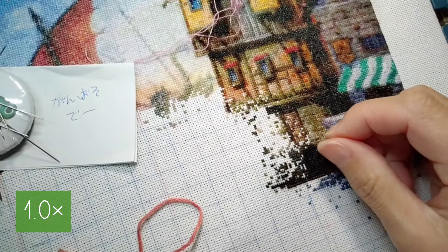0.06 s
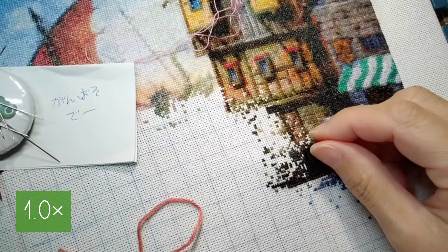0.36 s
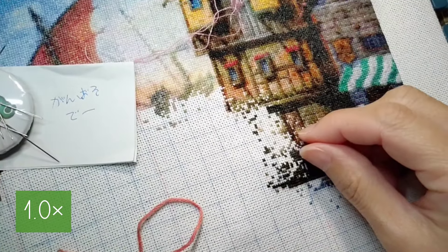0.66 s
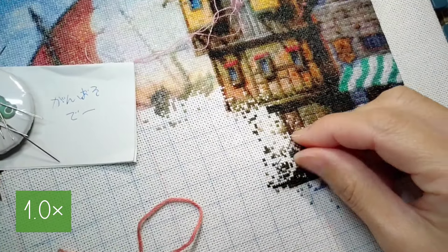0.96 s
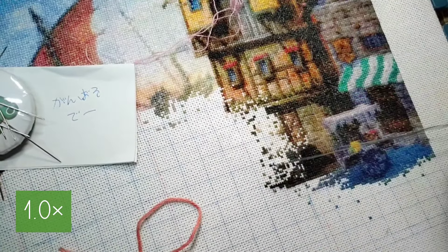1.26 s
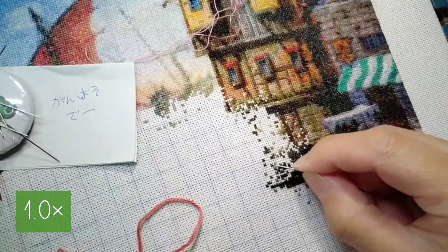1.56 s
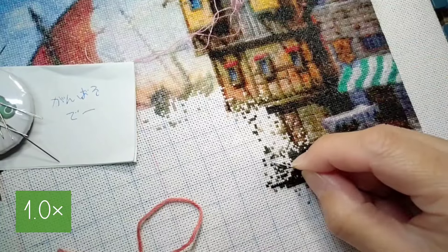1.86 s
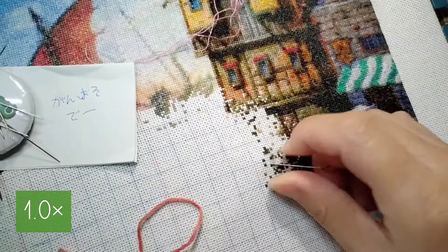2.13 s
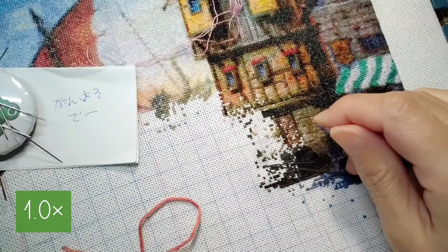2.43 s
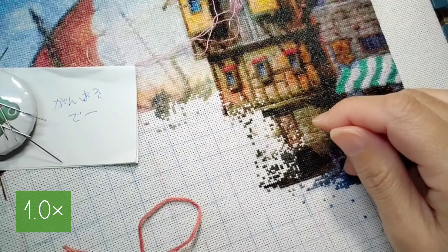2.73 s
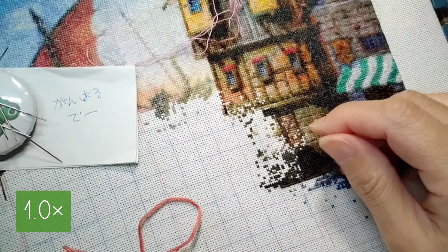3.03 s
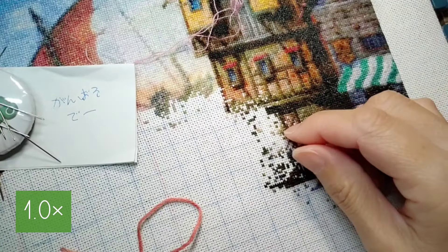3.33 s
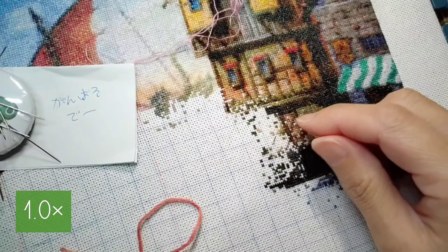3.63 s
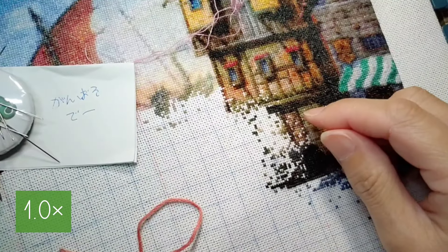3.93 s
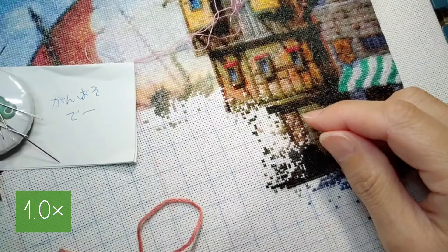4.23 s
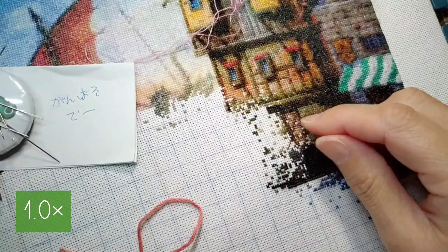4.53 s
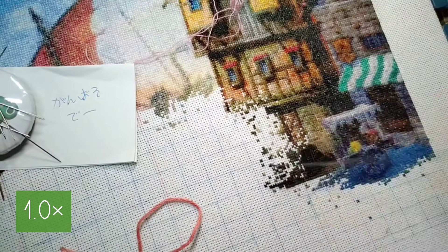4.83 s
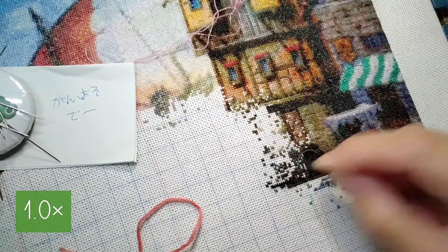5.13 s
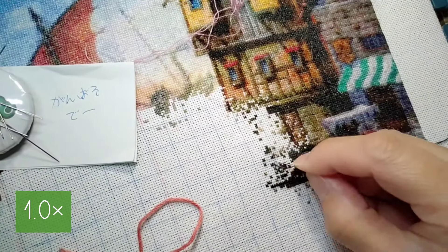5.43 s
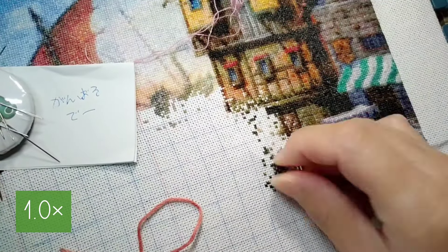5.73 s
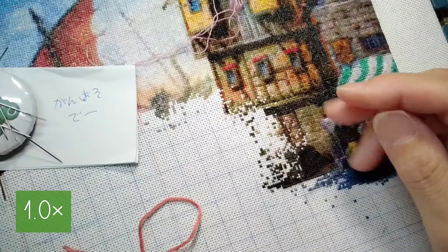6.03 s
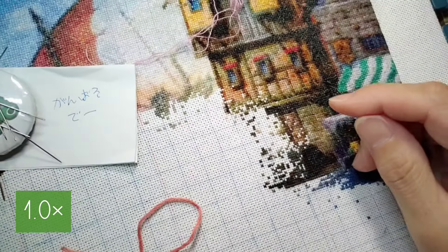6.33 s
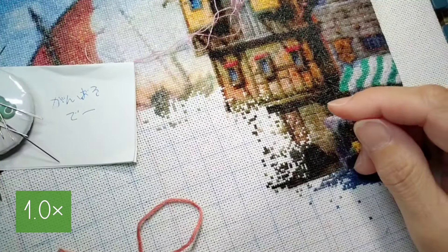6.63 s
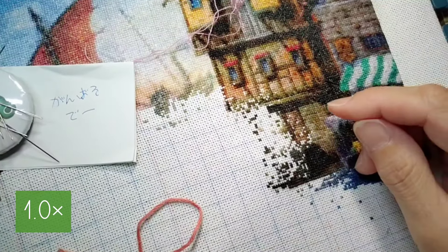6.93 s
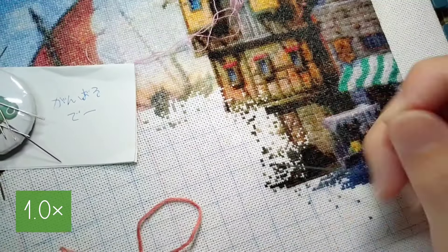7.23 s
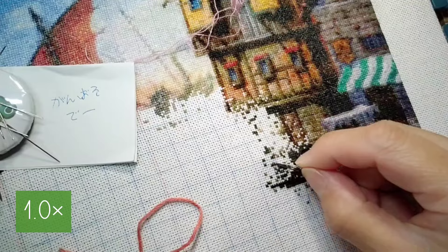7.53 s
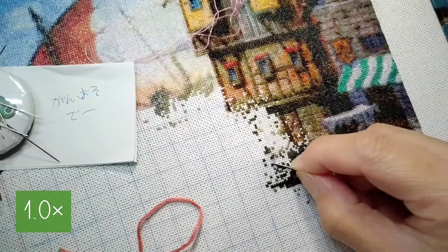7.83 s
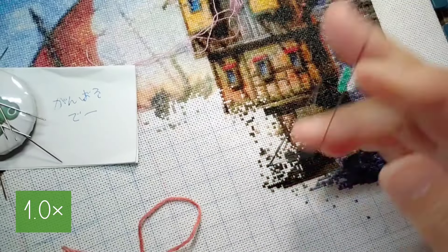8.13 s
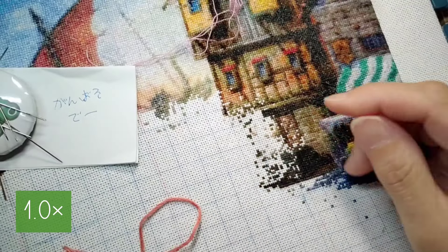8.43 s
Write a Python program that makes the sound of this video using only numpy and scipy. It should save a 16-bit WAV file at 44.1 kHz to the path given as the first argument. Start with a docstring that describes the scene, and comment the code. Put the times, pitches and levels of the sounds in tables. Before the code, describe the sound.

A needle taps through taut cloth and thread is drawn through in short, scratchy pulls, close by in a quiet room.

```python
"""Cross-stitch on cloth stretched in a frame, close by in a quiet room where an appliance hums faintly.
First the needle pops through the taut weave, which rings like a soft drum skin. At about 1 s the thread
is yanked up, juddering by stick-slip friction, and runs out with a hiss of fibres catching in the hole.
At 2 s the needle pierces again and the thread is hauled down in heaves, snagging on the way.
Two more stitches follow, up near 5 s and down near 6 s, then up near 7 s and down near 8 s."""
import sys
import numpy as np
from scipy import signal
from scipy.fft import rfft, irfft, next_fast_len
from scipy.io import wavfile

SR = 44100
rng = np.random.default_rng(int(sys.argv[2]) if len(sys.argv) > 2 else 0)


def transcribe(u):
    """Save the signal u as a 16-bit wav file named by the first command-line argument.

    u: samples, shape (n,) or (channels, n), limited to [-1, 1]; the rate is SR.
    q: integer samples, one column per channel.
    """
    v = np.clip(np.atleast_2d(u).T, -1, 1)
    q = np.round(v * 32767).astype(np.int16)
    wavfile.write(sys.argv[1], SR, q)


N = 373527
TIME = np.arange(N) / SR

# needle, thread and fingers flicking the cloth:
# (time [s], relative thump level [dB], nominal pitch [Hz], relative tick level [dB])
FLICKS = [(0.197, -49, 425, -58.5), (0.3148, -40.5, 750, -42), (0.41, -40.5, 177, -64),
          (2.043, -44.5, 540, -36), (2.266, -49.5, 276, -55), (2.399, -48, 700, -53),
          (3.053, -57, 440, -55), (3.364, -48, 513, -65), (3.395, -33.5, 726, -49.5),
          (3.409, -41, 523, -68), (3.999, -44.5, 483, -63), (4.117, -50, 195, -68),
          (4.186, -44.5, 307, -69), (4.272, -34, 405, -56.5), (4.483, -48, 205, -67), (5.28, -42, 75, -65),
          (5.996, -42, 790, -48.5), (6.194, -39, 218, -66), (6.223, -42, 420, -58.5),
          (6.429, -41.5, 453, -52), (6.453, -45, 483, -48.5), (6.461, -41.5, 516, -58),
          (6.491, -34, 555, -49), (6.544, -37, 240, -61), (6.562, -34, 496, -46.5), (6.769, -44, 590, -69),
          (6.791, -44, 520, -64), (6.946, -38.5, 293.4, -66.5), (8.218, -43, 170, -67)]
# the thread snagging in the hole:
# (time [s], jolt level [dB], jolt pitch [Hz], relative tick level [dB], crack level [dB])
THREAD_SNAGS = [(1.292, -40, 376, -39, -57), (2.391, -58.5, 298, -51, -66), (2.606, -44, 240, -59, -56),
                (2.65, -36, 298, -50, -50), (4.854, -40.5, 376, -43, -58), (5.911, -42.5, 458, -43, -52),
                (7.3, -40.5, 394, -37, -50), (8.133, -49, 420, -68, -48.5)]
# thread drawn up: (time [s], yank length [s], run length [s], relative level [dB])
UPWARD_PULLS = [(1.157, 0.13, 0.26, -48.5), (4.699, 0.14, 0.33, -49), (7.15, 0.142, 0.25, -47)]


def gain_of(db):
    """Amplitude ratio of a level in decibels."""
    return 10 ** (np.asarray(db) / 20)


def unit_rms(x):
    """Normalisation to rms 1."""
    return x / np.sqrt(np.mean(x ** 2) + 1e-20)


def curve_at(points, hz):
    """Interpolation on a log-frequency axis."""
    freqs, values = np.transpose(points)
    return np.interp(np.log(hz + 1), np.log(freqs + 1), values)


def add(mix, start_s, sound):
    """Superposition: a sound joins the mix at its start time."""
    part = mix[..., round(start_s * SR):][..., :sound.shape[-1]]
    part += sound[..., :part.shape[-1]]


def colour(x, spectrum, size=4096):
    """Minimum-phase filtering: a causal response with the given spectrum."""
    log_gain = np.log(gain_of(curve_at(spectrum, abs(np.fft.fftfreq(size, 1 / SR)))))
    response = np.exp(np.conj(signal.hilbert(log_gain)))
    taps = np.fft.ifft(response).real[:size // 2]
    return signal.oaconvolve(np.atleast_2d(x), taps[None], axes=1)[:, :N]


def wander(per_s):
    """Random modulation at rms 1, gliding between per_s values a second."""
    knots = rng.standard_normal(4096)
    return unit_rms(np.interp(TIME * per_s, np.arange(len(knots)), knots))


def held(start_s, length_s, rise_s, fall_s):
    """Envelope of a contact: exponential rise, plateau from start_s, exponential decay."""
    rising = np.maximum(start_s - TIME, 0) / rise_s
    falling = np.maximum(TIME - start_s - length_s, 0) / fall_s
    return np.exp(-np.minimum(rising + falling, 20))


def arch(start_s, length_s, power):
    """Envelope of a stroke that accelerates and slows: a parabola raised to a power."""
    progress = np.clip((TIME - start_s) / length_s, 0, 1)
    return (4 * progress * (1 - progress)) ** power


def ports(pair):
    """Spatial coherence: two microphone ports share long waves and differ in short ones."""
    # likeness of left and right: (frequency [Hz], correlation [0-1])
    coherence = [(100, .82), (300, .97), (900, .7), (1800, .3), (8000, .15)]
    size = next_fast_len(N)
    common, separate = rfft(pair, size)
    shared = np.clip(curve_at(coherence, np.fft.rfftfreq(size, 1 / SR)), 0, 1)
    left = shared * common + np.sqrt(1 - shared ** 2) * separate
    return irfft(np.array([left, common]), size)[:, :N]


def from_right(pair, lag_samples):
    """Path difference: sound reaches the farther, left port later."""
    return np.array([np.pad(pair[0], (lag_samples, 0))[:N], pair[1]])


def background(air_db, hum_hz, hum_db, waver):
    """Noise floor: under a steady hiss, rumble and appliance hum share one amplitude modulation."""
    # room air: (frequency [Hz], spectral level [dB])
    air_spectrum = [(25, -50), (60, -15), (100, -6), (135, -15.5), (200, -26), (350, -31), (1500, -37),
                    (6000, -38.5), (8300, -36), (10500, -43.5)]
    air = colour(ports(rng.standard_normal((2, N))), air_spectrum)
    hiss = signal.sosfiltfilt(signal.butter(4, 260, "high", fs=SR, output="sos"), air)
    rumble = air - hiss
    phasor = 1 + waver * (wander(per_s=13) + 1j * wander(per_s=9.1))
    swell = unit_rms(gain_of(7 * np.tanh(wander(per_s=19) + .5)))
    hum = unit_rms((phasor * np.exp(2j * np.pi * hum_hz * TIME)).real)
    return gain_of(air_db) * (hiss + swell * rumble) / np.std(hiss) + gain_of(hum_db) * swell * hum


def room(x):
    """Reverberation: a diffuse tail decays exponentially, each band at its own rate."""
    # the room's decay: (frequency [Hz], t60 [s])
    reverb_times = [(120, 0.49), (600, 0.27), (3000, 0.4), (9000, 0.39)]
    hz, t, bands = signal.stft(rng.standard_normal((2, SR // 2)), SR, nperseg=256)
    decay = gain_of(-60 * t / curve_at(reverb_times, hz)[:, None])
    tail = signal.istft(bands * decay, SR, nperseg=256)[1]
    tail = tail * (np.arange(tail.shape[1]) > .005 * SR)  # the first reflection takes 5 ms
    return ports(signal.oaconvolve(x, tail / np.linalg.norm(tail[0]), axes=1)[:, :N])


def hand_echo(x):
    """Comb filtering: a close reflection off the moving hand keeps shifting the colour."""
    delay_s = .0007 * np.exp(.3 * wander(per_s=9))
    return x + .5 * np.array([np.interp(TIME - delay_s, TIME, side) for side in x])


def rebounds(echo_db, decay_s, count=14):
    """Multiple reflection: frame, hand and table return a blow, differently wherever it lands."""
    jitter, polarity = rng.random((count, 2)).T
    delay_s = np.linspace(.0012, .024, count) + .0015 * jitter
    taps = np.zeros(SR // 30)
    taps[(delay_s * SR).astype(int)] = np.sign(polarity - .5) * np.exp(-delay_s / decay_s)
    taps *= gain_of(echo_db) / np.linalg.norm(taps)
    taps[0] = 1
    return taps


def cloth(x, ring, direct=1, pitch_swing=.045):
    """Membrane resonance: a push excites damped modes (gain: ring) that the hand's pressure retunes."""
    # the stretched cloth and its frame: (frequency [Hz], relative gain [dB], t60 [s])
    modes = [(95, 11.5, 0.12), (124.5, 5.5, 0.13), (313, -4, 0.27), (451, -0.5, 0.17), (540, -4, 0.058),
             (1260, -11.5, 0.017), (1540, -10, 0.02), (1740, 0, 0.0092), (2550, -3, 0.0095),
             (2730, -3.5, 0.013)]
    t, response = np.arange(SR // 4) / SR, 0
    for hz, db, t60 in modes:
        decay = np.exp(-np.log(1000) * t / t60)
        response = response + gain_of(db) * 2 * decay / decay.sum() * np.cos(2 * np.pi * hz * t)
    clock = np.cumsum(1 + pitch_swing * np.tanh(wander(per_s=14)))  # faster when the cloth is tauter
    steps = np.arange(int(clock[-1]) + 2)
    ringing = [signal.oaconvolve(np.interp(steps, clock, side), response)[:len(steps)] for side in x]
    return direct * x + ring * np.array([np.interp(clock, steps, side) for side in ringing])


def nudges():
    """Low-frequency excitation: a soft push on the frame stirs mainly the cloth's lowest modes."""
    # the hand rocking the frame from below: (time [s], length [s], level [dB])
    pushes = [(0.358, 0.031, -48.5), (1.56, 0.087, -56), (2.365, 0.042, -47.5), (3.392, 0.07, -51),
              (6.105, 0.166, -49)]
    # force of a push: (frequency [Hz], spectral level [dB])
    push_spectrum = [(25, -19), (50, -8), (85, -8.5), (135, -9), (230, -13.5), (600, -35)]
    envelope = sum(gain_of(db) * arch(start, length, power=0.67) for start, length, db in pushes)
    force = colour(ports(rng.standard_normal((2, N))), push_spectrum)
    return envelope * unit_rms(cloth(force, ring=1.0))


def swishes(rasp, centre_hz, width_hz, rasp_db, left_db):
    """Sliding friction of skin on thread: a faint rasp and a band of noise, mostly on the right."""
    # fingertips sliding along the thread before hauling it down: (time [s], length [s], level [dB])
    strokes = [(2.11, 0.27, -65), (5.737, 0.089, -59), (7.978, 0.14, -61.5)]
    envelope = sum(gain_of(db) * arch(start, length, power=1) for start, length, db in strokes)
    edges_hz = [centre_hz - width_hz / 2, centre_hz + width_hz / 2]
    band = signal.butter(1, edges_hz, "band", fs=SR, output="sos")
    whisper = unit_rms(signal.sosfilt(band, rng.standard_normal((2, N)))) * gain_of([[left_db], [0]])
    return envelope * (whisper + gain_of(rasp_db) * rasp)


def catches(per_s, spread_db, smooth=1.0):
    """Shot noise: fibres catch in random clicks of uneven size over the noise of a smooth slide."""
    size = gain_of(spread_db * np.minimum(rng.exponential(1, N), 4))
    clicks = size * (rng.random(N) < per_s / SR) * rng.standard_normal((2, N))
    return unit_rms(unit_rms(clicks) + smooth * rng.standard_normal((2, N)))


def fibre_scrape(grip):
    """Modulated friction noise, at rms 1: fibres catch harder as the grip tightens."""
    # scraping fibres: (frequency [Hz], spectral level [dB])
    scrape_spectrum = [(600, -28), (1250, 1), (2200, 2), (2800, -0.5), (3500, -5.5), (6000, 1),
                       (10500, -12.5)]
    fibres = grip * ports(catches(per_s=880, spread_db=2.2, smooth=0.91))
    return unit_rms(hand_echo(cloth(colour(fibres, scrape_spectrum), ring=0.4)))


def friction(slips_per_s, jerk_db, ring):
    """Sliding friction: irregular slips pluck the weave, giving a rasp and a scrape, each at rms 1."""
    # cloth under a sliding contact: (frequency [Hz], spectral level [dB])
    rasp_spectrum = [(45, -14.5), (100, -6.5), (220, -1.5), (480, -2), (700, -8), (950, -1.5),
                     (1700, -27.5)]
    grip = gain_of(jerk_db * wander(per_s=110))
    plucks = ports(catches(per_s=slips_per_s, spread_db=0.5))
    rasp = unit_rms(cloth(grip * colour(plucks, rasp_spectrum), ring))
    return rasp, fibre_scrape(grip)


def scratches():
    """Roughness excitation: the needle point drags briefly over the ribs of the weave."""
    # the point feeling its way: (time [s], length [s], rasp level [dB], scrape level [dB])
    drags = [(2.042, 0.018, -45.5, -60), (2.936, 0.067, -63, -70.5), (3.908, 0.089, -52, -69.5),
             (5.986, 0.014, -49, -51.5), (6.419, 0.028, -47, -68), (6.523, 0.043, -50, -67),
             (6.767, 0.03, -49, -61)]
    rasp, scrape = friction(slips_per_s=620, jerk_db=1.0, ring=6.5)
    sound = np.zeros((2, N))
    for start, length, rasp_db, scrape_db in drags:
        contact = held(start, length, rise_s=0.0023, fall_s=0.0055)
        sound += contact * (gain_of(rasp_db) * rasp + gain_of(scrape_db) * scrape)
    return sound


def judder(slow_hz, fast_hz, jitter, noise_gain, ring):
    """Stick-slip oscillation: yanked thread rasps and scrapes, slipping more often at higher speed."""
    # cloth plucked by the rising thread: (frequency [Hz], spectral level [dB])
    rasp_spectrum = [(110, -17.5), (220, -3), (320, -1), (520, -3.5), (720, -7.5), (1100, -16.5),
                     (1700, -34)]
    speed = sum(arch(start, yank_s, power=0.97) for start, yank_s, _, _ in UPWARD_PULLS)
    slip_hz = (slow_hz + (fast_hz - slow_hz) * speed) * np.exp(jitter * wander(per_s=400))
    cycles = np.cumsum(slip_hz) / SR
    plucks = np.diff(np.floor(cycles), prepend=0)  # one impulse a cycle
    force = unit_rms(plucks - plucks.mean()) + noise_gain * ports(rng.standard_normal((2, N)))
    grip = np.exp(-2 * (cycles % 1)) * gain_of(3 * wander(per_s=160))
    rasp = unit_rms(cloth(colour(force, rasp_spectrum), ring))
    return rasp, fibre_scrape(grip)


def blend(mix_db, movement):
    """Common modulation: one movement sets the envelopes of rasp, scrape and sheen."""
    return gain_of(mix_db)[:, None] * movement


def slack_slips():
    """Envelopes of light friction: slack thread hisses and hardly stirs the cloth."""
    # thread slipping through the hole: (time [s], length [s], relative level [dB])
    slips = [(1.541, 0.11, -59.5), (2.226, 0.083, -57.5), (2.452, 0.077, -61), (3.405, 0.084, -64),
             (5.151, 0.07, -62.5), (5.271, 0.038, -56), (6.044, 0.096, -52), (6.758, 0.056, -62.5),
             (7.489, 0.078, -56.5)]
    # timbre of a slip: (rasp [dB], scrape [dB], sheen [dB])
    slip_mix = (-10, -30, 2.5)
    movement = sum(gain_of(db) * arch(start, length, power=0.85) for start, length, db in slips)
    return blend(slip_mix, movement)


def pulls_down(swing_db, unsteady_db):
    """Envelopes of friction growing with speed: each heave swells, catches at its crest and eases."""
    # thread hauled from below:
    # (crest time [s], swell [s], fade [s], relative slide level [dB], relative catch level [dB])
    heaves = [(2.398, 0.12, 0.037, -47, -44.5), (2.603, 0.026, 0.19, -47.5, -38),
              (5.905, 0.071, 0.029, -39.5, -42), (6.105, 0.29, 0.16, -51.5, -51),
              (8.141, 0.074, 0.094, -40.5, -43), (8.248, 0.017, 0.12, -66, -41),
              (8.364, 0.22, 0.12, -48, -39)]
    # timbres of the slide and the catch: (rasp [dB], scrape [dB], sheen [dB])
    slide_mix = (-2, -10, -1)
    catch_mix = (-0.5, -7.5, -9)
    slides, grabs = 0, 0
    for crest, swell_s, fade_s, slide_db, catch_db in heaves:
        from_crest = np.minimum(np.maximum((crest - TIME) / swell_s, (TIME - crest) / fade_s), 1)
        contact = held(crest - swell_s, swell_s + fade_s, rise_s=0.037, fall_s=0.0052)
        slides = np.hypot(slides, gain_of(slide_db - swing_db * from_crest) * contact)
        grabs = grabs + gain_of(catch_db) * held(crest, 0, rise_s=0.018, fall_s=0.018)
    unsteady = gain_of(unsteady_db * wander(per_s=45))  # the hand never hauls quite evenly
    return np.hypot(blend(slide_mix, slides * unsteady), blend(catch_mix, grabs))


def pulls_up(sag_db_per_s, rise_s, fall_s):
    """Envelopes adding in power: the doubled end is yanked through, the single strand runs on, slowing."""
    # timbres of the yank and the run: (rasp [dB], scrape [dB], sheen [dB])
    yank_mix = (11.5, -3, -1)
    run_mix = (-8.5, -10.5, -4)
    yanks, runs = 0, 0
    for start, yank_s, run_s, db in UPWARD_PULLS:
        yanks = yanks + gain_of(db) * arch(start, yank_s, power=1.11)
        sag_db = sag_db_per_s * np.maximum(TIME - start, 0)
        runs = runs + gain_of(db - sag_db) * held(start + rise_s, run_s, rise_s, fall_s)
    return np.hypot(blend(yank_mix, yanks), blend(run_mix, runs))


def thread(envelopes, rasp, scrape, sheen_db=0.0):
    """Friction noise of thread in a hole: the cloth rasps, the fibres scrape and hiss in small surges."""
    # sheen, the fibres' high hiss: (frequency [Hz], spectral level [dB])
    sheen_spectrum = [(4000, -18), (6600, -14.5), (7600, -6), (8500, -1), (9400, -8.5), (10500, -21.5),
                      (15500, -26.5)]
    rasp_gain, scrape_gain, sheen_gain = envelopes
    surge = unit_rms(gain_of(2.3 * wander(per_s=80)))
    sheen = unit_rms(hand_echo(colour(catches(per_s=1500, spread_db=2.7), sheen_spectrum)))
    return rasp_gain * rasp + surge * (scrape_gain * scrape + gain_of(sheen_db) * sheen_gain * sheen)


def snags(crack_band_hz, lead_s=.01):
    """Sudden release of tension: thread tears free and jolts the cloth, with a dry crack on the crest."""
    t, jolts = np.arange(-lead_s, lead_s, 1 / SR), np.zeros((1, N))
    band = signal.butter(2, crack_band_hz, "band", fs=SR, output="sos")
    crack = unit_rms(signal.sosfilt(band, signal.unit_impulse(len(t), "mid")))
    for time, db, hz, _, crack_db in THREAD_SNAGS:
        phase = 2 * np.pi * hz * t
        pulse = unit_rms((1 - phase ** 2) / (1 + phase ** 2) ** 2)
        jolt = gain_of(db) * pulse + gain_of(crack_db) * crack
        add(jolts, time - lead_s, signal.oaconvolve(jolt, rebounds(echo_db=-9, decay_s=.006)))
    return cloth(jolts, ring=1.0)


def ticks(level_db, snap_s, slide_db, slide_s, crack_gain):
    """Broadband transients: steel or thread clears the weave with a crack, a snap and a dying slide."""
    # the needle's tick: (frequency [Hz], spectral level [dB])
    tick_spectrum = [(800, -16), (1700, -0.5), (3400, -5), (4700, 0.5), (6500, -3.5), (8100, 8), (9800, -7),
                     (15500, -16.5)]
    t, fibres, cracks = np.arange(SR // 6) / SR, np.zeros((2, N)), np.zeros(N)
    envelope = unit_rms(np.exp(-t / snap_s) + gain_of(slide_db) * np.exp(-t / slide_s))
    impulse = unit_rms(signal.unit_impulse(len(t)))
    for time, _, _, db, *_ in FLICKS + THREAD_SNAGS:
        gain = gain_of(db + level_db)
        add(fibres, time - snap_s / 2, gain * unit_rms(envelope * rng.standard_normal((2, len(t)))))
        add(cracks, time, gain * impulse)
    return cloth(colour(ports(fibres) + crack_gain * cracks, tick_spectrum), ring=0.34)


def thumps(level_db, sharpness, knock_db, knock_hz, ring, lead_s=.01):
    """Elastic recoil: dragged cloth springs back in a two-sided pulse; the needle knocks its upper modes."""
    t, blows, knocks = np.arange(-lead_s, lead_s, 1 / SR), np.zeros((1, N)), np.zeros((1, N))
    knock_phase = 2 * np.pi * knock_hz * t
    knock = gain_of(knock_db) * unit_rms(knock_phase * np.exp(-knock_phase ** 2 / 2))
    for time, db, hz, _ in FLICKS:
        gain = gain_of(db + level_db)
        phase = 2 * np.pi * hz * sharpness * t
        recoil = gain * unit_rms(phase / (1 + phase ** 2) ** 2)
        add(blows, time - lead_s, signal.oaconvolve(recoil, rebounds(echo_db=-7, decay_s=.011)))
        chatter = gain * rebounds(echo_db=-2, decay_s=.002)
        hardness = (hz / knock_hz) ** 2  # soft blows hardly knock
        add(knocks, time - lead_s, hardness * signal.oaconvolve(knock, chatter))
    return cloth(blows, ring) + cloth(knocks, ring=1, direct=0)


def scene():
    """Superposition of the stitching, a little to the right, its reverberation and the background."""
    # level difference between the ports: (frequency [Hz], left minus right [dB])
    balance = [(100, -2.5), (350, -5.5), (1100, 1), (2400, -4.5), (6500, -3), (8600, 3.5), (11500, -7)]
    up_rasp, up_scrape = judder(slow_hz=260, fast_hz=370.2, jitter=.2, noise_gain=0.68, ring=2.9)
    up = thread(pulls_up(sag_db_per_s=18, rise_s=0.015, fall_s=0.047), up_rasp, up_scrape)
    rasp, scrape = friction(slips_per_s=600, jerk_db=2.5, ring=1.5)
    hauling = pulls_down(swing_db=11.5, unsteady_db=-1.5) + slack_slips()
    down = thread(hauling, rasp, scrape, sheen_db=-0.5)
    drags = scratches()
    hands = nudges() + swishes(rasp, centre_hz=2790, width_hz=620, rasp_db=-15.5, left_db=-5)
    sliding = up + down + drags + hands
    snaps = ticks(level_db=-8.5, snap_s=0.0013, slide_db=-14.5, slide_s=0.027, crack_gain=0.23)
    pops = thumps(level_db=-8.5, sharpness=0.68, knock_db=11.0, knock_hz=1250, ring=1.08)
    pops = pops + snags(crack_band_hz=[1300, 4560])
    tail = room(gain_of(-11) * pops + gain_of(-9.5) * snaps + gain_of(-6.5) * sliding)
    left, right = from_right(sliding + pops + tail, lag_samples=12) + from_right(snaps, lag_samples=3)
    left = colour(left, [(hz, db / 2) for hz, db in balance])
    right = colour(right, [(hz, -db / 2) for hz, db in balance])
    return np.vstack([left, right]) + background(air_db=-72.5, hum_hz=98.9, hum_db=-69.5, waver=2.3)


def record(dry):
    """Band limiting: a steep linear-phase low-pass removes the highest treble."""
    edge_hz = 15750
    taps = signal.firwin(511, edge_hz, window=("kaiser", 9), fs=SR)
    return signal.oaconvolve(dry, taps[None], "same")


dry = scene()
out = record(dry)
transcribe(out)
```